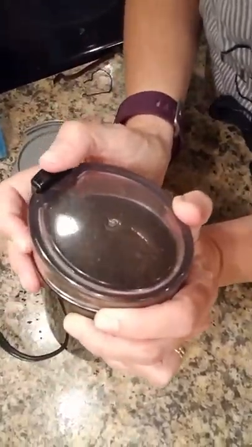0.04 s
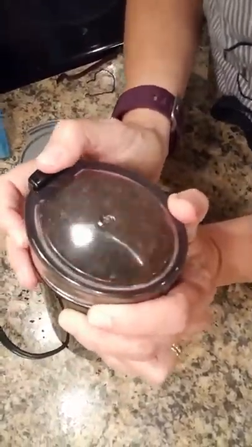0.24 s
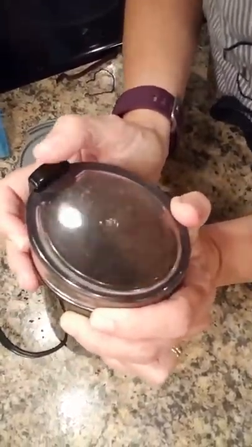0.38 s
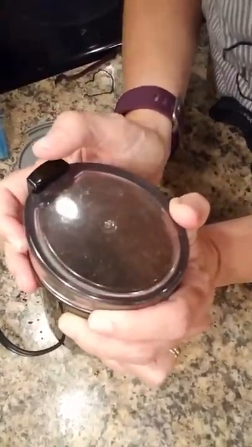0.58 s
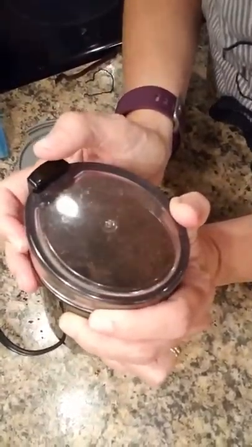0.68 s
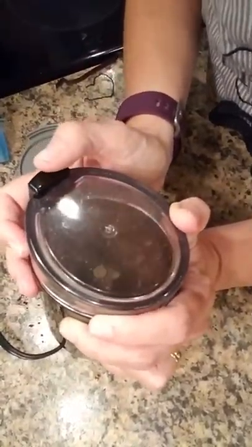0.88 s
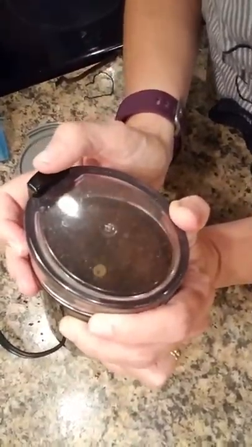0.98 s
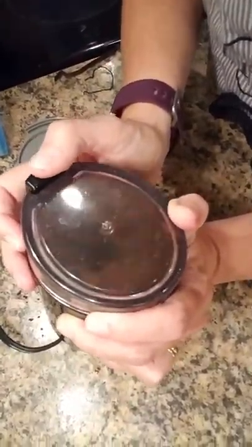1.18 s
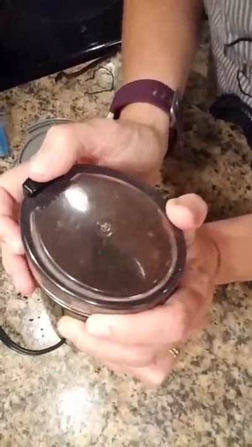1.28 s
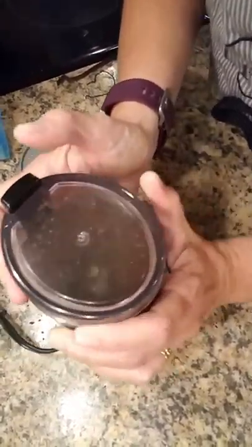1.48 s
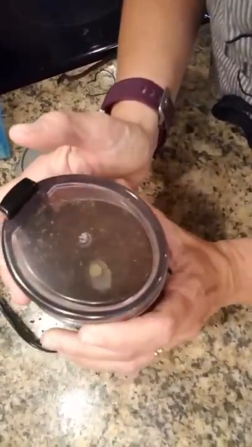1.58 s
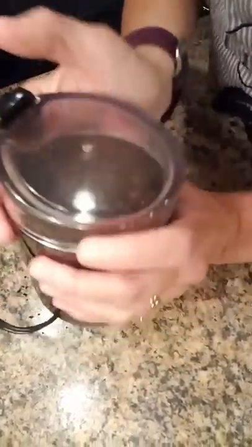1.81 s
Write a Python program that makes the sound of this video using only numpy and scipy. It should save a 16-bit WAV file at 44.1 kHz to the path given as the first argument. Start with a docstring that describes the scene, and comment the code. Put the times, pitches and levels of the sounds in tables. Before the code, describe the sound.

An electric bean grinder gives one longer burst, then a shorter one, with gritty clattering

```python
"""A small electric blade grinder, held on a stone kitchen counter, is pulsed twice.
Each press gives a jolt and a mains buzz; the shaft tone climbs as the blade spins up and sinks as it coasts.
Grit and bean pieces hit the steel cup and plastic lid: dense random impacts set off noise bursts and rings.
Single cracks and knocks stand out, made of fading noise, ringing and low swings.
Fingers tap the housing before and after; a short room tail and quiet room tone surround it all."""
import sys
import numpy as np
from scipy import signal
from scipy.fft import rfft, irfft
from scipy.io import wavfile

SR = 44100
rng = np.random.default_rng(int(sys.argv[2]) if len(sys.argv) > 2 else 0)


def bounce(signal):
    """Save signal as a 16-bit WAV file at the path given by the first command-line argument."""
    frames = np.transpose(np.atleast_2d(signal))
    limited = np.clip(frames, -1, 1)
    pcm = np.round(limited * 32767).astype(np.int16)
    wavfile.write(sys.argv[1], SR, pcm)


N = 81585
T = np.arange(N) / SR
RING_T = T[:SR // 4]
ALIKE_BELOW_HZ = 550   # the two channels part gradually above this
SIDES = np.array([[1], [-1]])   # left, right

# ways the plastic lid rings: (pitch_hz, level_db, t60_s, left_minus_right_db)
LID_MODES = [(330, -8, .08, -3.5), (566.3, -8, 0.085, 6), (613.3, -2, 0.075, -4.5), (682, 1, 0.037, -5.5),
             (847, 2.5, 0.059, -4), (941, -5, 0.066, -1), (1245, -4, 0.021, 12)]
# noise colours of fine grit, bean chips and the rattling lid: (pitch_hz, level_db, left_minus_right_db)
GRIT_COLOUR = [(1518, -33.5, -0.5), (4400, -6.5, -1.5), (7580, -7.5, -1.5), (8980, -1.5, -4.5),
               (11600, -0.5, -6.5), (13000, 0.5, -1), (15800, 0.5, -6.5)]
CHIP_COLOUR = [(200, -14, -3.5), (973, -9, -5.5), (1630, -14, -1.5), (1754, 2.5, -4), (4160, 0, 5.5),
               (6060, -5, 2), (8980, -14.5, 3.5), (15000, -15.5, -3.5)]
RATTLE_COLOUR = [(148.2, -12, 1.5), (330, 0.5, 0.5), (616, -3.5, -5), (990, -6.5, -9), (1330, 1.5, 3.5),
                 (2225, -4, -0.5), (5000, -23.5, 3.5)]


def from_db(db):
    """Turn decibels into gain."""
    return 10 ** (np.asarray(db) / 20)


def rms_one(x):
    """Scale to an average strength (rms) of 1."""
    return x / np.sqrt(np.mean(x ** 2) + 1e-20)


def unit_energy(response):
    """Scale a stereo response so that it keeps the level of what it filters."""
    return response / np.sqrt(np.sum(response ** 2) / 2)


def decay(t60, t=RING_T):
    """Fade by 60 dB every t60 seconds from time zero; silent before."""
    return (t >= 0) * np.exp(-np.log(1000) * np.maximum(t, 0) / t60)


def through(x, response):
    """Pass a signal through a stereo response, so each impact starts its ring or tail."""
    return signal.fftconvolve(np.atleast_2d(x), response, axes=1)[:, :N]


def noise(colour):
    """Stereo noise of a given colour and balance, alike on both sides in the bass; rms 1."""
    hz = np.maximum(np.fft.rfftfreq(N, 1 / SR), 1)
    points, db, pan = np.transpose(colour)
    db = np.interp(np.log(hz), np.log(points), db)
    pan = np.interp(np.log(hz), np.log(points), pan)
    alike = 1 / (1 + (hz / ALIKE_BELOW_HZ) ** 2)
    mid, side = rfft(rng.standard_normal((2, N)))
    spectrum = np.sqrt(1 + alike) * mid + SIDES * np.sqrt(1 - alike) * side
    return rms_one(irfft(spectrum * from_db(db + SIDES * pan / 2), N))


def noise_band(low_hz, high_hz):
    """Stereo noise between two frequencies; rms 1."""
    band = signal.butter(2, [low_hz, high_hz], "band", fs=SR, output="sos")
    return rms_one(signal.sosfilt(band, rng.standard_normal((2, N))))


def modal(modes):
    """Ring of a body as fading sines; high modes reach the two sides out of step."""
    out = 0
    for hz, db, t60, pan in modes:
        step = rng.choice([-1, 1]) * np.arctan(hz / ALIKE_BELOW_HZ / 2) * 0.55
        phase = SIDES * step + rng.uniform(0, 2 * np.pi)
        level = from_db(db + SIDES * pan / 2) / np.sqrt(t60)
        out = out + level * decay(t60) * np.sin(2 * np.pi * hz * RING_T + phase)
    return unit_energy(out)


def impacts(per_s, spread_db):
    """Random impacts of uneven size and sign; rms 1."""
    born = rng.random(N) < per_s / SR
    size = from_db(spread_db * np.minimum(rng.exponential(1, N), 3))
    return rms_one(born * size * rng.choice([-1, 1], N))


def bursts(hits, t60, colour):
    """Each impact adds energy that drains away, heard as its own short burst of noise."""
    r = np.exp(-2 * np.log(1000) / (t60 * SR))   # share of the energy left after one sample
    energy = signal.lfilter([1 - r], [1, -r], hits ** 2 + 1e-18)
    return np.sqrt(energy) * noise(colour)


def follow(pulses, axis):
    """Gain over time from one table column: each pulse rises just before its first row, then releases."""
    attack_s, release_db_per_s = 0.0065, 290.5
    out = 0
    for rows in map(np.array, pulses):
        s = rows[:, 0]
        attack = np.clip(1 + (T - s[0]) / attack_s, 0, 1)
        release_db = release_db_per_s * np.maximum(T - s[-1], 0)
        out = out + attack * from_db(np.interp(T, s, rows[:, axis]) - release_db)
    return out


def knock(s, hz, t60):
    """One damped swing of a body, starting softly at s."""
    attack_s = 0.0025
    t = np.maximum(T - s, 0)
    return (1 - np.exp(-t / attack_s)) * decay(t60, t) * np.sin(2 * np.pi * hz * t)


def drift(per_s):
    """Smooth random wander through about per_s random points a second; rms 1."""
    steps = np.arange(N) * per_s / SR
    return rms_one(np.interp(steps, np.arange(N), rng.standard_normal(N)))


def room_tone():
    """Quiet noise of the room, its level drifting slowly."""
    # noise colour: (pitch_hz, level_db, left_minus_right_db)
    air_colour = [(25, -29, -1), (58.3, 1, -1.5), (142, -3.5, -4), (250, -14, -2), (590, -17.5, 0.5),
                  (1184, -28, -2), (2283, -30.5, -0.5), (6010, -45.5, 0.15), (15000, -43, -1)]
    # level over time: (time_s, level_db)
    air_level = [(0, -54.5), (0.2, -50), (1.1, -58.5), (1.85, -57)]
    return from_db(np.interp(T, *np.transpose(air_level))) * noise(air_colour)


def fingers():
    """Light taps on plastic: a short broad ring made of noise, a tick and a soft thud."""
    # taps on lid and housing: (start_s, ring_db, pitch_hz, ring_width_hz, tick_db, thud_db)
    taps = [(0.054, -51.5, 1850, 349, -80, -68), (0.1104, -42, 3910, 1292, -43.5, -36),
            (1.74, -52, 705, 406, -69, -45), (1.837, -41, 2200, 1500, -57.5, -73)]
    # noise colour of the tick: (pitch_hz, level_db, left_minus_right_db)
    tick_colour = [(299, -7.5, -1), (1285, -7.5, 0), (2080, 5.5, 0.5), (4150, -11, 4), (7010, -7, -0.5),
                   (14900, -11.5, -2)]
    ring_t60_s, tick_t60_s, thud_hz, thud_t60_s = 0.034, 0.057, 127.8, 0.085
    out, tick = 0, noise(tick_colour)
    for s, ring_db, hz, width, tick_db, thud_db in taps:
        ring = noise_band(max(hz - width / 2, hz / 2), hz + width / 2)
        out = out + from_db(ring_db) * decay(ring_t60_s, T - s) * ring
        out = out + from_db(tick_db) * decay(tick_t60_s, T - s) * tick
        out = out + from_db(thud_db) * knock(s, thud_hz, thud_t60_s)
    return out


def presses():
    """Each press jolts the housing into damped swings and adds a mains buzz while power is on."""
    # power is on: (start_s, length_s, jolt_db, hum_db)
    power = [(0.245, 0.13, -16, -36), (1.271, 0.0625, -23.5, -30)]
    # swings of the housing after a jolt: (pitch_hz, level_db, t60_s)
    jolt_modes = [(123.6, 1, 0.12), (311.4, -7.5, 0.11), (572, -27, 0.066)]
    # multiples 1-5 of the mains buzz: level_db
    hum_levels = [-0.5, -21.5, -14, -14.5, -15.5]
    hum_hz, hum_release_s = 120.4, 0.004
    out = 0
    for s, length, jolt_db, hum_db in power:
        powered = (T > s) * np.exp(-np.maximum(T - s - length, 0) / hum_release_s)
        buzz = sum(from_db(db) * np.sin(2 * np.pi * (k + 1) * hum_hz * (T - s))
                   for k, db in enumerate(hum_levels))
        jolt = sum(from_db(jolt_db + db) * knock(s, hz, t60) for hz, db, t60 in jolt_modes)
        out = out + jolt + from_db(hum_db) * powered * buzz
    return out


def shaft():
    """Tone of the unbalanced shaft, one cycle a turn; beans brake the blade unevenly, so it flutters."""
    # one list for each pulse: (time_s, turns_per_s, level_db)
    spins = [
        [(0.25, 57.5, -60.5), (0.32, 265, -52.5), (0.35, 285, -38), (0.40, 307, -39), (0.48, 256, -46.5),
         (0.54, 224, -40.5), (0.70, 140, -39.5), (0.78, 110, -64.5)],
        [(1.27, 65, -72.5), (1.34, 153, -38.5), (1.42, 144, -38), (1.48, 49, -64)],
    ]
    flutter_db, speed_jitter, flutter_per_s = 2, .035, 70   # jitter is a share of the speed
    out = 0
    for rows in spins:
        s, hz, db = np.transpose(rows)
        speed = np.interp(T, s, hz) * (1 + speed_jitter * drift(flutter_per_s))
        turns = np.cumsum(speed) / SR
        level = from_db(np.interp(T, s, db) + flutter_db * drift(flutter_per_s))
        spinning = (T > s[0]) * (T < s[-1])
        out = out + spinning * level * np.sqrt(2) * np.sin(2 * np.pi * turns)
    return out


def motor():
    """Jolts, buzz and shaft tone, with the low noise of the housing shaking in the hands."""
    # one list for each pulse: (time_s, level_db)
    shake = [
        [(0.26, -28.5), (0.36, -43), (0.476, -54), (0.7, -43.5), (0.95, -52)],
        [(1.28, -27.5), (1.418, -48.5), (1.576, -33), (1.69, -46.5)],
    ]
    # noise colour of the housing: (pitch_hz, level_db, left_minus_right_db)
    housing_colour = [(30, -32.5, -2.5), (65, -15.5, 1.5), (92.6, 3.5, -4), (150.8, 1.5, -1.5),
                      (240, -17.5, -7), (495, -39, 3), (1490, -47.5, -2.5)]
    shaking = from_db(0.5) * follow(shake, axis=1) * noise(housing_colour)
    return (presses() + shaft()) * from_db([[-2], [1.6]]) + shaking   # left, right dB


def cracks():
    """A bean shatters: a bright spray and a clack at its own pitch, each a sharp spike and a short tail."""
    # hard hits of the blade on a bean: (start_s, snap_db, clack_db, clack_pitch_hz)
    hard_hits = [(0.245, -18, -19, 3850), (0.2633, -21, -14, 2200), (0.3418, -14, -20.5, 2070),
                 (0.3915, -27, -19, 3700), (0.4133, -9, -27, 3420), (0.4509, -29, -16.5, 3350),
                 (0.458, -32, -21, 3600), (0.5679, -13.5, -20, 3240), (0.629, -11.5, -21.5, 3200),
                 (0.638, -14, -20.5, 2520), (0.6983, -4, -13.5, 3370), (0.7447, -17, -28, 3200),
                 (0.88, -23.5, -21.5, 2100), (1.268, -46, -28, 2180), (1.28, -26, -20.5, 2050),
                 (1.298, -21.5, -15.5, 1880), (1.373, -10, -24, 5800), (1.404, -15, -20.5, 3100),
                 (1.43, -31, -22.5, 2440), (1.556, -17, -17.5, 3850)]
    tail_t60_s, spike_t60_s, spike_db = 0.043, .007, -13   # the spike is the first instant
    band_db, broad_db, width_octaves = -3, -2.5, .6
    out, spray, broad = 0, noise(GRIT_COLOUR), from_db(broad_db) * noise(CHIP_COLOUR)
    half = 2 ** (width_octaves / 2)
    for s, snap_db, clack_db, hz in hard_hits:
        fade = decay(tail_t60_s, T - s) + from_db(spike_db) * decay(spike_t60_s, T - s)
        clack = broad + from_db(band_db) * noise_band(hz / half, hz * half)
        out = out + fade * (from_db(snap_db) * spray + from_db(clack_db) * clack)
    return out


def knocks():
    """Knocks of the body, some from motor kicks: a dull clack, the ring of the lid and a low thud."""
    # knocks: (start_s, clack_db, thud_db)
    body_knocks = [(0.245, -22, -23), (0.2542, -18.5, -11.5), (0.263, -24, -17), (0.319, -46, -21),
                   (0.831, -34, -40), (1.279, -22, -24), (1.4297, -28, -39), (1.5273, -28, -42),
                   (1.5544, -27, -22)]
    clack_t60_s, lid_db, thud_hz, thud_t60_s = 0.042, -7.5, 105, 0.041
    force = sum(from_db(db) * decay(clack_t60_s, T - s) for s, db, _ in body_knocks)
    thud = sum(from_db(db) * knock(s, thud_hz, thud_t60_s) for s, _, db in body_knocks)
    clack = force * noise(RATTLE_COLOUR)
    lid = from_db(lid_db) * through(force * rng.standard_normal(N), modal(LID_MODES))
    return clack + lid + thud * from_db([[-2], [1.6]])   # left, right dB


def contents():
    """Grit sprays the wall, bean pieces ring the cup, heavy pieces rattle the lid."""
    # contents hitting the cup, one list for each pulse: (time_s, fine_grit_db, bean_pieces_db, lid_rattle_db)
    load = [
        [(0.246, -32, -25, -30), (0.264, -17, -20.5, -28), (0.285, -20.5, -21.5, -30.5),
         (0.322, -27.5, -31.5, -39.5), (0.394, -20.5, -20.5, -38), (0.462, -22.5, -27.5, -34.5),
         (0.48, -23.5, -30, -43), (0.52, -23, -26, -34), (0.784, -24, -30, -39), (0.794, -24.5, -26, -30.5),
         (0.9, -35.5, -35.5, -39)],
        [(1.275, -30.5, -22.5, -38.5), (1.297, -22, -25, -46), (1.359, -27.5, -31, -30),
         (1.379, -22.5, -34.5, -43.5), (1.441, -23, -28, -34), (1.479, -22.5, -29.5, -37.5),
         (1.553, -28, -33, -34.5), (1.615, -37, -38.5, -40), (1.665, -46, -50.5, -50.5)],
    ]
    # ways the steel cup rings: (pitch_hz, level_db, t60_s, left_minus_right_db)
    cup_modes = [(1904, 3.5, 0.05, -1.5), (2036, 2.5, 0.068, -0.5), (2252, -5.5, 0.07, -10),
                 (2436, 1, 0.036, 5), (2985, -6.5, 0.08, -3), (3240, 3, 0.07, 1), (3604, 2, 0.035, 2.5),
                 (3864, 3, 0.029, 3.5), (4050, -1, 0.07, -0.5), (4744, -11.5, 0.0079, 1.5)]
    # brief dips in the level of all the contents: (centre_s, dip_db)
    lulls = [(0.689, -2.5), (1.368, -7)]
    lull_width_s = 0.013
    grit_per_s, chips_per_s, beans_per_s, rattle_per_s = 2900, 1500, 940, 790
    grit_db, chips_db, cup_db, lid_db, rattle_db = 6, -0.5, -3.5, -1.5, -11.5
    grit_t60_s, chip_t60_s, rattle_t60_s = 0.021, 0.022, 0.0076

    fine, pieces, heavy = follow(load, axis=1), follow(load, axis=2), follow(load, axis=3)
    grit_hits = fine * impacts(grit_per_s, spread_db=5.0)
    grit = from_db(grit_db) * bursts(grit_hits, grit_t60_s, GRIT_COLOUR)
    chip_hits = pieces * impacts(chips_per_s, spread_db=5.0)
    chips = from_db(chips_db) * bursts(chip_hits, chip_t60_s, CHIP_COLOUR)
    bean_hits = pieces * impacts(beans_per_s, spread_db=1.5)
    cup = from_db(cup_db) * through(bean_hits, modal(cup_modes))
    tumbling = heavy * impacts(rattle_per_s, spread_db=4)
    lid = from_db(lid_db) * through(tumbling, modal(LID_MODES))
    rattle = from_db(rattle_db) * bursts(tumbling, rattle_t60_s, RATTLE_COLOUR)
    lull_db = sum(db * np.exp(-((T - s) / lull_width_s) ** 2) for s, db in lulls)
    return (grit + chips + cup + lid + rattle) * from_db(lull_db)


def kitchen(x):
    """Short diffuse tail of a small hard room; the treble dies sooner."""
    t60_s, treble_t60_s, level_db, delay_s = 0.36, .24, -16, 0.0049
    t = T[:SR // 2] - delay_s
    white = rng.standard_normal((2, len(t)))
    low = signal.sosfiltfilt(signal.butter(2, 6000, fs=SR, output="sos"), white)
    tail = low * decay(t60_s, t) + (white - low) * decay(treble_t60_s, t)
    return from_db(level_db) * through(x, unit_energy(tail))


def scene():
    """Grinder and hands in the kitchen, over the room tone; the small body radiates no deep bass."""
    close = fingers() + cracks() + knocks() + contents()
    low_cut = signal.butter(3, 67, "high", fs=SR, output="sos")   # Hz
    return signal.sosfilt(low_cut, close + kitchen(close) + motor()) + room_tone()


def record(dry):
    """Peaks are rounded and the top is cut."""
    peak_limit, cutoff_hz = 0.65, 15850
    cut = signal.ellip(12, .1, 95, cutoff_hz, fs=SR, output="sos")
    return signal.sosfilt(cut, peak_limit * np.tanh(dry / peak_limit))


dry = scene()
out = record(dry)
bounce(out)
```